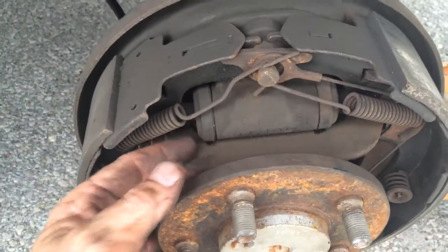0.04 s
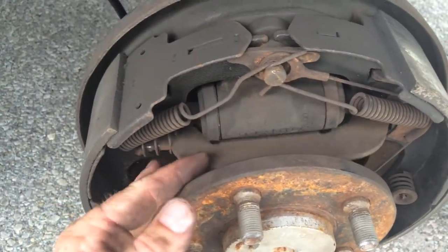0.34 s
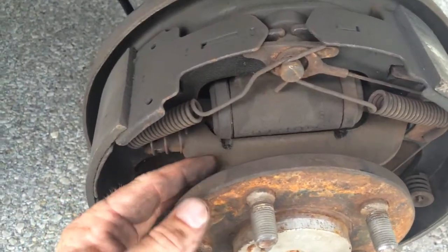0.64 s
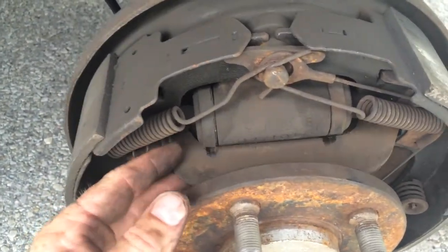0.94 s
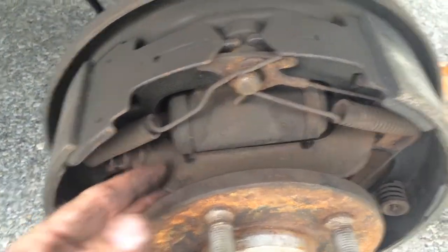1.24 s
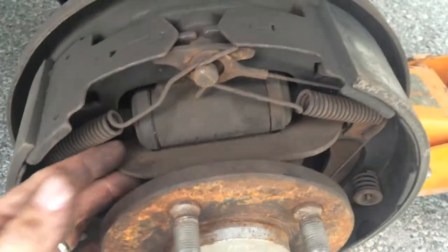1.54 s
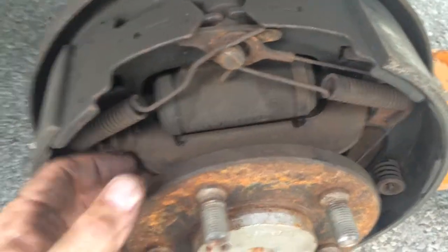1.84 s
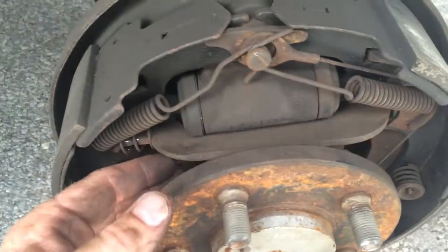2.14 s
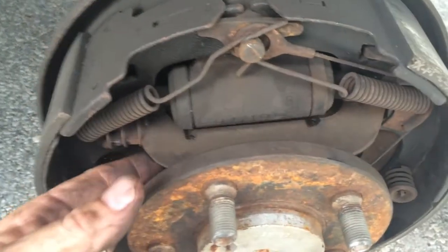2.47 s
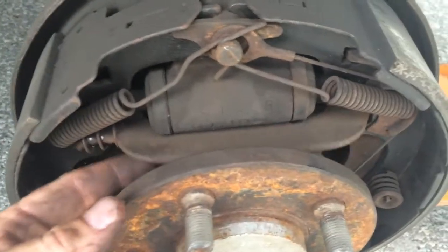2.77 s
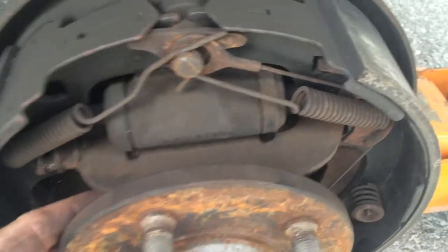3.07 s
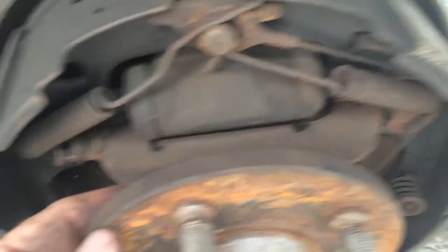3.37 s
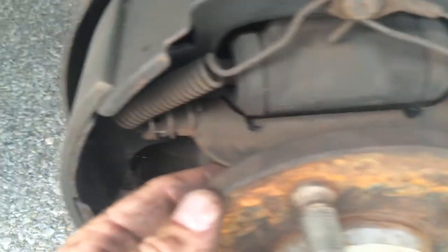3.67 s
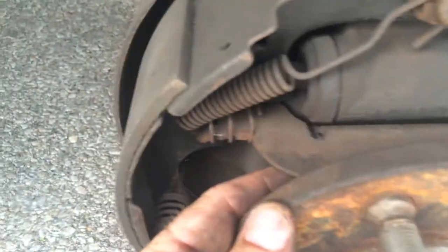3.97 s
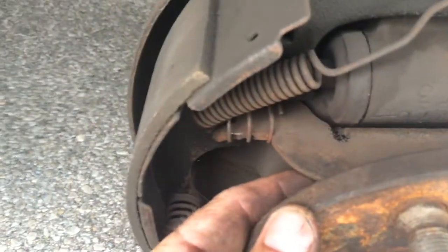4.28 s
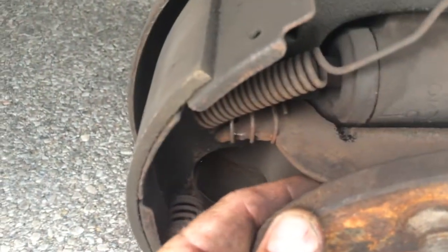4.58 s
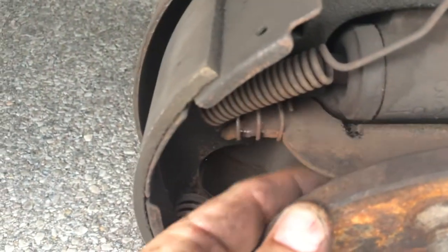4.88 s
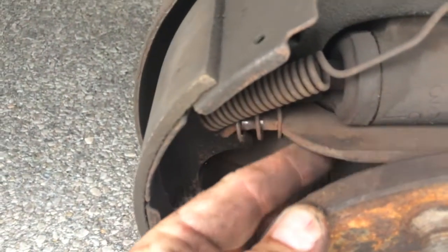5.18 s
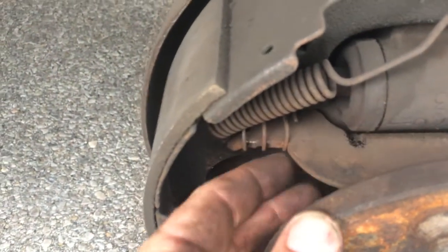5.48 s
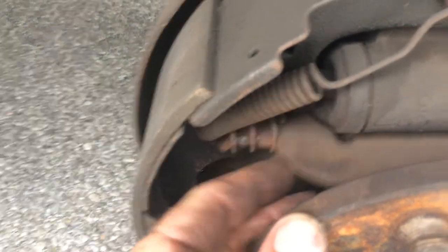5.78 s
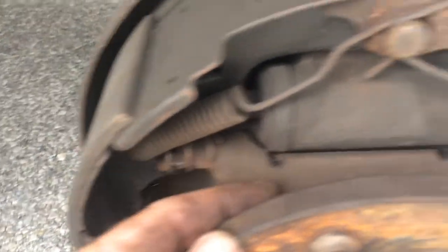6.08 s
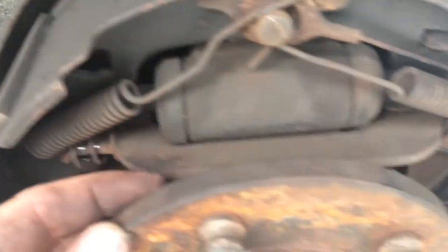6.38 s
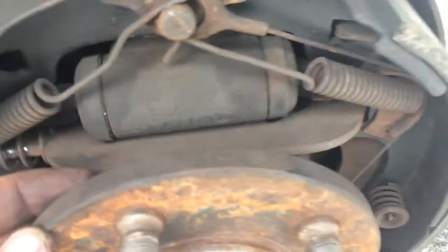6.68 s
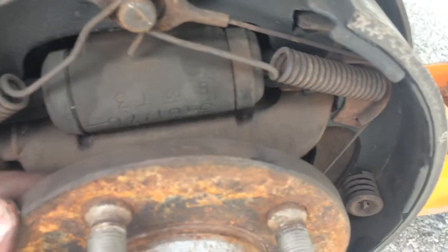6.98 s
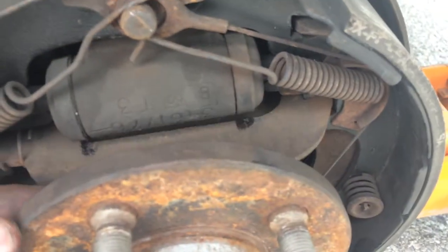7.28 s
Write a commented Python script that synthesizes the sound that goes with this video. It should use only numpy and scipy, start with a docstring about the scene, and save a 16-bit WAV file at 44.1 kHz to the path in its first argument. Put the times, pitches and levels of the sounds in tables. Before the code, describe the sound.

A hand jiggles a loose strut against brake shoes and springs, making rapid metallic clicks and clatter over a low rumble.

```python
"""Loose strut in a drum brake

Close on an open drum brake in a garage, one microphone, low outdoor rumble behind. A hand wiggles the
strut: steel clacks on the shoes in quick bursts and slides gritty between contacts. An edge squeaks,
a return spring zings, clips tick and the backing plate rings on faintly. Now and then the hand bumps
the assembly dully. The walls answer softly."""
import sys
import numpy as np
from scipy import signal
from scipy.fft import rfft, irfft, next_fast_len
from scipy.io import wavfile
from scipy.ndimage import uniform_filter1d, minimum_filter1d, map_coordinates

SR = 44100
rng = np.random.default_rng(int(sys.argv[2]) if len(sys.argv) > 2 else 0)


def transcribe(u):
    """Save the signal u as a 16-bit wav file named by the first command-line argument.

    u: samples, shape (n,) or (channels, n), limited to [-1, 1]; the rate is SR.
    q: integer samples, one column per channel.
    """
    v = np.clip(np.atleast_2d(u).T, -1, 1)
    q = np.round(v * 32767).astype(np.int16)
    wavfile.write(sys.argv[1], SR, q)


N = 322812
USUAL_DB = -28  # strength of an ordinary contact

# the strut lands on steel: t/s, strength/dB, hardness (zing over knock)/dB, shoe share/dB, spring share/dB
CONTACTS = [(.034, -27.5, -4.5, -0.5, -16), (.159, -43, -11, -15, -13), (.187, -31.5, 2, -26, -15.5),
            (.201, -18.5, 11, -18, -22), (0.285, -33, -2, -14, -18), (.422, -27.5, -1.5, -10, -33),
            (.542, -46, -12.5, 0.5, -21), (.607, -27.5, -1, -7, -40), (0.698, -18, 8.5, -35, -15),
            (0.724, -29.5, 1, -21, -17), (0.9044, -17.5, 11, -15, -28), (.982, -36, 1, -8.5, -27),
            (1.058, -26, 1.5, -26, -14), (1.088, -30, -0.5, -3, -7.5), (1.213, -36.5, -6, -23, -14),
            (1.294, -27.5, 3.5, 3, -20), (1.396, -23.5, -1.5, -23, -19), (1.434, -41, -13, -28.5, -3.5),
            (1.498, -35.5, 11, -16, -8), (1.526, -29, -2.5, 1, -16), (1.564, -28.5, -5.5, -22, -19),
            (1.602, -29, 0, -35, -16), (1.766, -29.5, -4.5, -29, -12.5), (1.7744, -21, 11.5, -20, -6.5),
            (2.19, -26, -6.5, -18, -24), (2.219, -21, 2, -27.5, -14), (2.324, -40, 27, -11.5, -2),
            (2.339, -28, 0, -27, -11), (2.354, -20, 7.5, -28, -8), (2.461, -33, -3, -15, -10),
            (2.574, -33.5, -2.5, -9, -13), (2.643, -24, -6, -30, -24), (2.7544, -27.5, 12, -22.5, -15),
            (2.776, -14.5, 13.5, -27, -11), (2.816, -32, -3, -7, -14), (2.869, -27.5, -4.5, -21, -27),
            (2.885, -34.5, -2, -21.5, -17), (2.94, -35, 15, -18.5, -16), (2.959, -33.5, -3, -25, -3.5),
            (3.062, -24.5, -0.5, -27.5, -25), (3.208, -27.5, -4, -6, -21), (3.268, -51.5, -20, 1, -11),
            (4.761, -21, -2, -18, -19), (4.824, -33, -10.5, -2.5, -11), (4.894, -36, -11.5, -30, -8),
            (4.926, -26, -6.5, -2, -8), (4.961, -51, -5, 16.5, -9.5), (5.032, -27.5, -12.5, -21, -9),
            (5.046, -21.5, 13, -31, -14), (5.143, -32, 20, -30, -20), (5.153, -26.5, -3.5, -5, -12),
            (5.175, -21.5, 16, -3.5, -4.5), (5.2371, -26, -6, -15, -19), (5.26, -23.5, 5, -6.5, -14),
            (5.353, -27.5, -2, -5.5, -10.5), (5.446, -69.5, -28.5, 29, -20), (5.494, -64, -20, 21, 2),
            (5.856, -51, -20, 14.5, -20), (5.909, -40, -16.5, 4.5, -11), (5.938, -45, -3, -12, -14),
            (5.966, -31, 6, -13, -20), (5.981, -29, 17, -24, -11), (6.0058, -21.5, 9.5, -13, -11),
            (6.116, -55.5, -23, 12, -7), (6.432, -35, -11.5, -21, -17), (6.531, -31.5, 0, -26, -7),
            (6.546, -32.5, -6.5, -18, -4.5), (6.565, -37.5, -12, 10, -12), (6.613, -58, -18, 17.5, -20),
            (6.732, -30.5, -4.5, -12, -13), (6.748, -33.5, 4, -21, -25), (6.796, -41, -9, -21, -5),
            (6.845, -36, 7, -12, -16), (6.863, -20, 9, -30, -6), (6.933, -21.5, -4, -42, -22),
            (6.955, -22.5, 5, -26, -16), (7.065, -29.5, 12, -28, -24), (7.091, -19.5, 8, -28, -9.5),
            (7.17, -36.5, -5, -25, -10), (7.242, -32.5, -4, -25, -18)]
# modes of shoes and strut: f/Hz, level/dB, decay time as a multiple of the contact's t60
STEEL_MODES = [(662, -16, .8), (1176, -10, 1.3), (1365, -6, .9), (1522, -2, 1.1), (1640, -4, 1.1),
               (1880, -6, .8), (2080, -6, .8), (2645, -4, .9), (2870, -2, .8), (2965, -1, .9),
               (3036, 1, 1.4), (3120, -4, .8), (4680, -7, .9), (4968, -2, 1), (5245, -3, .9), (6885, 5, 1),
               (6760, 0, .7), (7602, 5, 1.3), (8230, -7, .8), (9270, 4.5, 1), (9380, 3, .7), (9600, 1, .8),
               (10341, 2.5, 1.1), (11806, 3, 1.1), (12660, -6, .8), (13474, -1, .8), (13857, -3, .9),
               (14271, -3, .9)]


def amp(db):
    return 10 ** (np.asarray(db) / 20)


def unit(x):
    return x / np.sqrt(np.mean(x ** 2) + 1e-20)


def struck(x):
    """x scaled to rms 1 over its first 20 ms."""
    return x / np.sqrt(np.mean(x[:SR // 50] ** 2) + 1e-20)


def along(points, hz):
    """Interpolate (f/Hz, value) points on a log frequency axis."""
    f, values = np.transpose(points)
    return np.interp(np.log(hz + 1), np.log(f), values)


def filtered(x, response):
    """x through a gain given as a function of frequency."""
    size = next_fast_len(len(x) + 8192)
    return irfft(rfft(x, size) * response(np.fft.rfftfreq(size, 1 / SR)), size)[:len(x)]


def colour(x, points):
    """x shaped by a (f/Hz, level/dB) curve, at rms 1."""
    return unit(filtered(x, lambda hz: amp(along(points, hz))))


def noise(n, spectrum):
    return colour(rng.standard_normal(n), spectrum)


def shine(x, db):
    """x with its top treble shelved by db."""
    return filtered(x, lambda hz: amp(along([(8000, 0.0074), (10500, db)], hz)))


def wobble(rate):
    """A smooth random curve, rate knots a second."""
    knots = rng.standard_normal(int(N * rate / SR) + 4)
    return map_coordinates(knots, [np.arange(N) * rate / SR])


def add(track, at, sound):
    start = max(round(at * SR), 0)
    track[start:start + len(sound)] += sound[:max(N - start, 0)]


def ringing(modes, t):
    """One damped sine per (f/Hz, level/dB, t60/s) row."""
    hz, db, t60 = np.transpose(modes)[:, :, None]
    return amp(db - 60 * t / t60) * np.sin(2 * np.pi * (hz * t + rng.random(hz.shape)))


def bell(modes, detune, t):
    """A few modes, shifted a little in pitch together, at rms 1 over their attack."""
    shifted = np.array(modes) * [1 + rng.normal(0, detune), 1, 1]
    return struck(ringing(shifted, t).sum(0))


def blows(usual_t60=0.062):
    """Levels and decay of each contact: hard ones knock less, zing more and ring longer."""
    at, strength, hardness, shoe, spring = np.transpose(CONTACTS)
    knock = USUAL_DB - 3 + 0.87 * (strength - USUAL_DB) - 0.67 * hardness
    t60 = usual_t60 * 2 ** (hardness / 36)
    # t/s, knock/dB, clang/dB, zing/dB, shoe/dB, spring/dB, t60/s
    return np.column_stack([at, knock, strength, knock + hardness, strength + shoe, strength + spring, t60])


def effort(span_s=.2):
    """How busy the hand is: contacts nearby, in tens a second; faint ones count for less."""
    at, strength = np.transpose(CONTACTS)[:2, :, None]
    near = np.maximum(1 - np.abs(np.arange(0, N, 64) / SR - at) / span_s, 0)
    weight = np.minimum(amp(strength - USUAL_DB), 1)
    busy = (near * weight).sum(0) / span_s / 10
    return np.interp(np.arange(N), np.linspace(0, N, len(busy)), busy)


def background(rest_db=-53, work_db=-49.5, lumpy_db=3, air_db=-57):
    """Lumpy handling rumble that swells as the hand works, over steady air from outdoors."""
    # spectra of the rumble and the air: f/Hz, level/dB
    rumble = [(20, -36), (40, -12.5), (60, 2), (100, 3), (160, -1), (300, -7.5), (600, -16), (1500, -70)]
    air = [(60, 0.5), (200, -20.5), (350, -6), (700, -5.5), (1080, -5.5), (2000, -16), (4000, -25.5),
           (8000, -30.5), (14600, -38), (16000, -54)]
    swell = np.sqrt(amp(rest_db) ** 2 + amp(work_db) ** 2 * effort())
    lumps = amp(lumpy_db * wobble(22))
    return swell * lumps * noise(N, rumble) + amp(air_db) * noise(N, air)


def garage(x, wet_db=-23):
    """The walls return a faint tail, 10 ms behind the direct sound; its treble dies first."""
    # reverberation time: f/Hz, t60/s
    decay = [(200, .9), (1000, 1.2), (2500, .9), (4200, .5), (7000, .3), (14000, .2)]
    # colour of the reflections: f/Hz, level/dB
    walls = [(200, 5), (1200, -1), (2500, -6), (3100, -5), (4200, -10.5), (7000, -6.5), (15000, -15)]
    hz, t, spectrum = signal.stft(rng.standard_normal(SR), SR, nperseg=256)
    fade = amp(-60 * t / along(decay, hz)[:, None])
    tail = colour(signal.istft(spectrum * fade, SR, nperseg=256)[1], walls)
    response = np.pad(tail / np.linalg.norm(tail), (SR // 100, 0))
    return amp(wet_db) * signal.fftconvolve(x, response)[:N]


def hand_bumps(t60=0.071, rise_s=0.0024, thud_db=-7):
    """The soft hand shoves the assembly: a few low swings and a thud."""
    # shoves: t/s, relative level/dB, f/Hz
    shoves = [(.02, -29, 161), (.14, -30, 67), (0.734, -30, 170), (.769, -29.5, 168), (.797, -27, 159),
              (1.234, -23.5, 100), (1.723, -26.5, 161), (1.873, -28, 108.4), (2.1, -25.5, 95.2),
              (2.235, -29, 400), (2.269, -25.5, 95), (2.609, -28, 168), (2.729, -25, 157),
              (2.89, -28.5, 290), (3.137, -24, 150), (3.314, -23, 84.2), (3.725, -31.5, 132),
              (4.654, -27.5, 105), (4.839, -24, 58.3), (5.436, -24.5, 129), (6.297, -21, 135),
              (6.618, -24, 100)]
    # spectrum of the thud: f/Hz, level/dB
    thud = [(25, -13.5), (60, 16), (120, 1), (230, -0.5), (400, -22.5), (800, -33), (1500, -62.5)]
    t = np.arange(SR // 4) / SR
    envelope = amp(-1 - 60 * t / t60) * (1 - np.exp(-t / rise_s))
    out = np.zeros(N)
    for at, db, hz in shoves:
        swing = np.sin(2 * np.pi * hz * t) + amp(thud_db) * noise(len(t), thud)
        add(out, at, amp(db) * swing * envelope)
    return out


def backing_plate(scatter_db=4):
    """The plate rings on: the shoe's hollow knock feeds its low modes, the clang its high ones."""
    # plate modes: f/Hz, level/dB, t60/s
    modes = [(305, -24, .45), (1040, -27, 2), (1240, -26, 1.3), (1610, -27, 1.3), (1533, -28, 1),
             (2990, -31, .9), (3045, -27, .7), (4820, -35, .45), (4966, -32, .5), (5245, -37, .4)]
    rings = ringing(modes, np.arange(SR) / SR)
    is_low = np.array(modes)[:, 0] < 2000
    out = np.zeros(N)
    for at, _, clang, _, shoe, *_ in blows():
        drive_db = np.where(is_low, shoe, clang) + rng.normal(0, scatter_db, len(modes))
        add(out, at, amp(drive_db) @ rings)
    return out


def loose_clips(count=3, reach_s=0.037, t60=.045, level_db=-12, spread_db=3):
    """Clips and washers tick a few times after each contact, weaker as they settle."""
    # spectrum of a tick: f/Hz, level/dB
    spectrum = [(200, -7), (600, -0.5), (1200, 6), (3000, 1), (5200, 2.5), (7300, -11), (10000, -14),
                (15500, -25)]
    t = np.arange(SR // 16) / SR
    out = np.zeros(N)
    for at, knock, clang, *_ in blows():
        for late in rng.random(count):
            tick = noise(len(t), spectrum) * amp(-60 * t / t60)
            db = (knock + clang) / 2 + rng.normal(level_db, spread_db) - 8 * late
            add(out, at + 0.0056 + reach_s * late, amp(db) * struck(tick))
    return out


def edge_squeaks(detune=0.0032, rise_s=0.0026):
    """The strut's edge catches and rings only the highest modes."""
    # catches: t/s, level/dB
    catches = [(.075, -39), (1.05, -32), (1.492, -39), (2.322, -18.5), (2.574, -33.5), (2.755, -25),
               (4.909, -33.5), (5.142, -21.5), (5.342, -32), (6.531, -24)]
    # the edge's thin whistle: f/Hz, level/dB, t60/s
    whistle = [(10470, -3, 0.049), (11770, -0.5, 0.061), (13160, -6.5, 0.074), (14271, -4, .08)]
    t = np.arange(SR // 8) / SR
    out = np.zeros(N)
    for at, db in catches:
        add(out, at, amp(db) * bell(whistle, detune, t) * (1 - np.exp(-t / rise_s)))
    return out


def rusty_slides(grains_per_s=700, spread_db=6, ring_t60=0.057, grit_t60=0.1, lead_s=0.014):
    """Rust grains catch and slip, each a tiny tap on the steel."""
    # steel sliding on steel: start/s, end/s, relative level/dB
    strokes = [(.009, 0.05, -27.5), (0.067, 0.11, -34.5), (.125, 0.215, -36.5), (0.357, 0.368, -35),
               (0.479, 0.522, -38), (0.673, 0.721, -23), (0.828, 0.91, -37), (0.943, 1.003, -39.5),
               (1.049, 1.063, -34.5), (1.268, 1.3, -33.5), (1.484, 1.593, -34.5), (1.664, 1.696, -30.5),
               (1.739, 1.766, -40), (2.182, 2.191, -33.5), (2.31, 2.348, -29), (2.449, 2.459, -29.5),
               (2.57, 2.572, -27.5), (2.752, 2.769, -20), (2.93, 2.982, -34.5), (3.185, 3.22, -35),
               (4.817, 4.832, -37), (4.903, 4.92, -25.5), (4.998, 5.03, -37.5), (5.14, 5.199, -32.5),
               (5.33, 5.344, -29), (5.478, 5.483, -37), (5.687, 5.723, -37), (5.87, 5.944, -39.5),
               (6.269, 6.274, -52.5), (6.384, 6.427, -38.5), (6.514, 6.556, -31), (6.701, 6.735, -31.5),
               (6.791, 6.878, -35.5), (7.048, 7.069, -27), (7.207, 7.255, -38.5)]
    # the strut's small coil, set off by rubbing: f/Hz, level/dB, t60/s
    coil = [(5245, -2, .07), (6880, -3, .07)]
    # spectrum of the grit: f/Hz, level/dB
    grit = [(200, -28), (700, 3.5), (1300, 1), (3000, 8), (6000, -4), (9000, -27.5), (14300, -20.5),
            (15600, -34)]
    # a faint, short swell of grit just before each clack
    lead_ins = [(at - lead_s, at, strength - 16.5) for at, strength, *_ in CONTACTS]
    t = np.arange(SR // 6) / SR
    steel = np.array(STEEL_MODES) * [1, 1, ring_t60]
    rings = np.vstack([ringing(steel, t), ringing(coil, t)])
    out = np.zeros(N)
    for start, end, db in strokes + lead_ins:
        n = max(round((end - start) * SR), SR // 200)
        slips = (rng.random(n) < grains_per_s / SR) * rng.choice([-1, 1], n)
        grains = slips * amp(rng.normal(0, spread_db, n))
        grains *= np.linspace(.25, 1, n)  # louder as a slide gathers speed
        body = amp(rng.normal(0, 3.5, len(rings))) @ rings
        body += noise(len(t), grit) * amp(8 - 60 * t / grit_t60)
        body = shine(body, -0.5 + 0.3 * (db - USUAL_DB))  # more pressure, more hiss
        add(out, start, amp(db - 1) * signal.fftconvolve(unit(grains), body / np.linalg.norm(body)))
    return out


def return_spring(t, gain_db=6.5, hold_s=.06):
    """The shaken spring zings briefly, then falls silent quickly."""
    # spring modes: f/Hz, level/dB, t60/s
    modes = [(4226, 0, .085), (4265, -7, .05)]
    return amp(gain_db - 10 * (t / hold_s) ** 4) * bell(modes, detune=.002, t=t)


def steel_clack(t, knock_db, clang_db, zing_db, t60, bands, detune=0.003, scatter_db=4, crack_t60=0.011):
    """Each blow lands on a new spot and shares its energy differently among the same modes."""
    # countless weak modes blurred into noise: f/Hz, level/dB
    dense_modes = [(150, -13), (350, -8.5), (650, -2), (1100, 3), (2000, -3), (3000, 11), (3700, 2.5),
                   (5200, 1), (6100, 3), (7300, 13.5), (8600, 5.5), (10000, 10.5), (14300, -1),
                   (15500, -20)]
    modes = np.array(STEEL_MODES) * [1, 1, t60]
    modes[:, 0] *= 1 + rng.normal(0, detune, len(modes))
    modes[:, 2] *= 2 ** rng.normal(0, 0.29, len(modes))  # the fingers damp each mode differently
    tones = amp(rng.normal(0, scatter_db, len(modes))) @ ringing(modes, t)
    clatter = amp(8.5) * noise(len(t), dense_modes)
    crack = amp(5 - 60 * t / crack_t60)
    tails = [amp(-60 * t / max(t60 * life, .02)) for life in (3.5, 1, 0.89)]  # the low band lasts longest
    low, mid, high = [signal.sosfilt(band, tones + clatter * (crack + tail))
                      for band, tail in zip(bands, tails)]
    high = shine(high, rng.normal(-2, 1.5))  # a sharp edge excites more top treble than a flat face
    return amp(knock_db) * struck(low) + amp(clang_db) * struck(mid) + amp(zing_db) * struck(high)


def strut_contacts(chatter=0.21, rise_s=0.00061, choke_s=0.24):
    """The strut lands and chatters once, sounding the hollow shoe and shaking the spring."""
    # the shoe's hollow tone: f/Hz, level/dB, t60/s
    shoe_modes = [(1037.5, 11.5, 0.063), (1153, 0.5, 0.02), (1630, -2.5, 0.02), (2190, -8, .07)]
    bands = [signal.butter(4, hz, kind, fs=SR, output="sos")
             for hz, kind in [(2200, "low"), ([2200, 6000], "band"), (6000, "high")]]
    t = np.arange(SR // 7) / SR
    # the hand presses the parts together after they meet and chokes the ring
    grip = (1 - np.exp(-t / rise_s)) * amp(-20 * (t / choke_s) ** 2)
    out = np.zeros(N)
    for at, knock, clang, zing, shoe, spring, t60 in blows():
        hit = steel_clack(t, knock, clang, zing, t60, bands)
        lag = round(rng.uniform(.002, 0.0088) * SR)
        hit += chatter * np.pad(hit, (lag, 0))[:len(t)]
        hit += amp(shoe - 1) * bell(shoe_modes, detune=.011, t=t)
        hit += amp(spring) * return_spring(t)
        add(out, at, hit * grip)
    return out


def scene():
    """The brake up close, the garage around it and the background, in mono."""
    brake = strut_contacts() + backing_plate() + loose_clips()
    brake += rusty_slides() + edge_squeaks() + hand_bumps()
    return (brake + garage(brake) + background())[None]


def record(dry):
    """A quick limiter holds the sharpest peaks; the microphone drops deep bass and the very top."""
    ceiling, hold = .7, SR // 400
    bottom_hz, top_hz = 34, 15700
    needed = np.minimum(1, ceiling / (np.abs(dry[0]) + 1e-9))
    gain = uniform_filter1d(minimum_filter1d(needed, hold), hold)
    low_cut = lambda hz: (1 + (bottom_hz / (hz + 1)) ** 6) ** -.5
    high_cut = lambda hz: (1 + (hz / top_hz) ** 120) ** -.5
    return filtered(dry[0] * gain, lambda hz: low_cut(hz) * high_cut(hz))[None]


dry = scene()
out = record(dry)
transcribe(out)
```